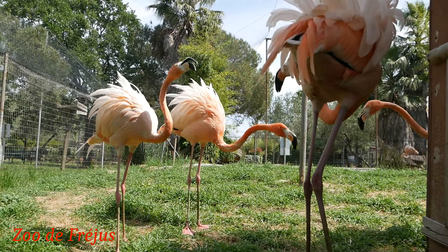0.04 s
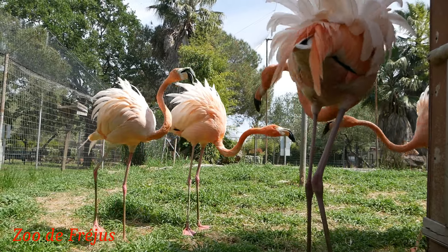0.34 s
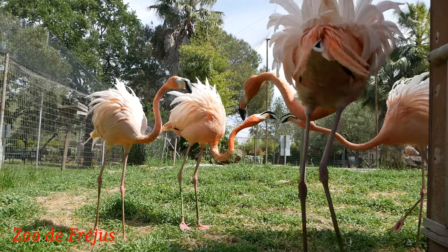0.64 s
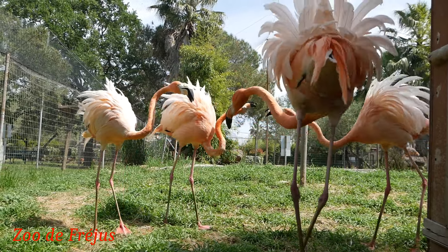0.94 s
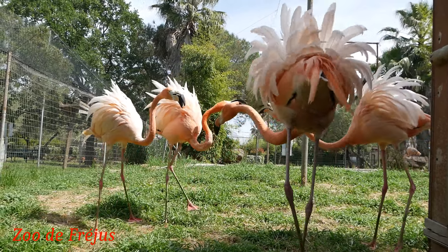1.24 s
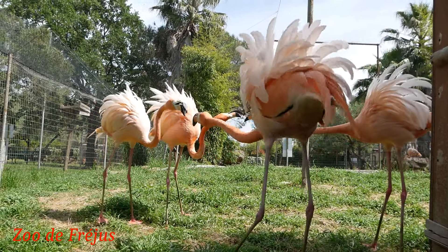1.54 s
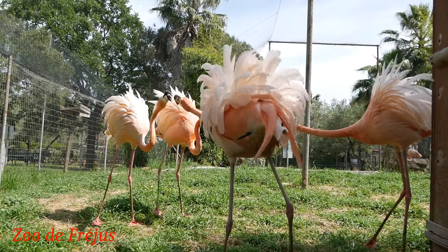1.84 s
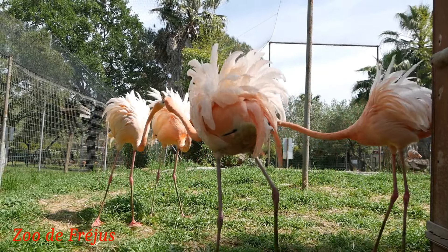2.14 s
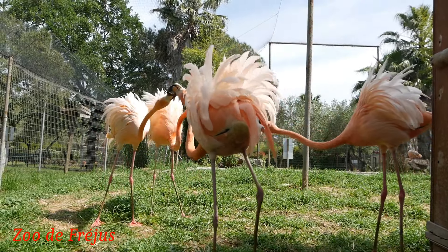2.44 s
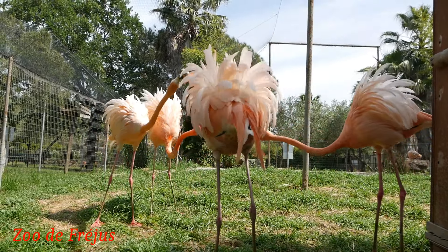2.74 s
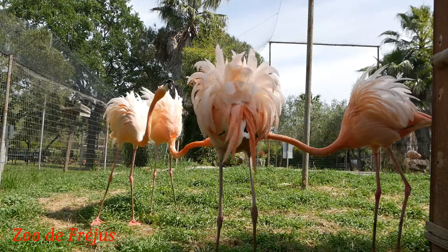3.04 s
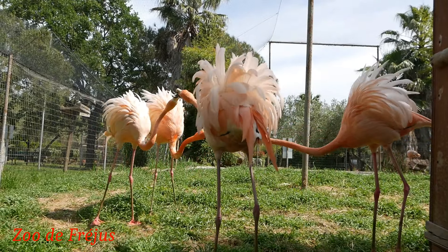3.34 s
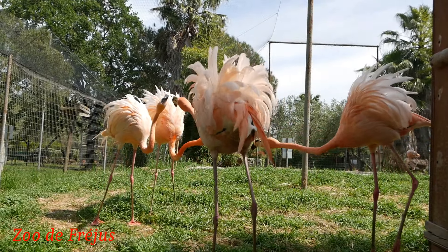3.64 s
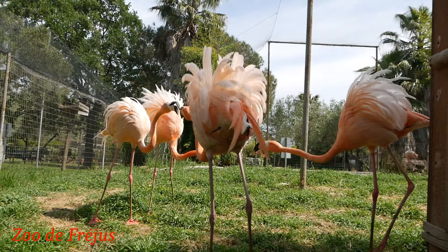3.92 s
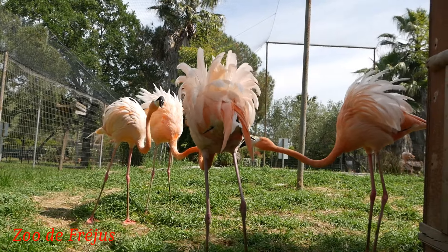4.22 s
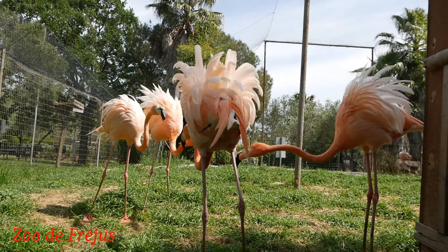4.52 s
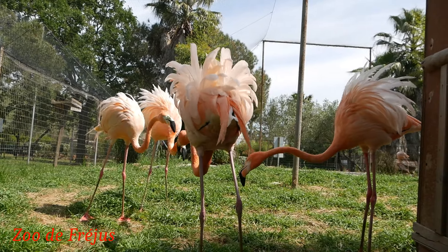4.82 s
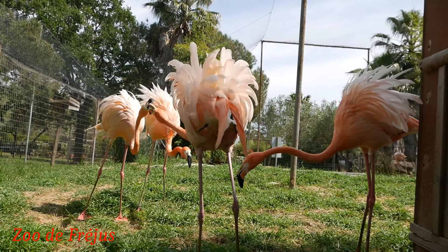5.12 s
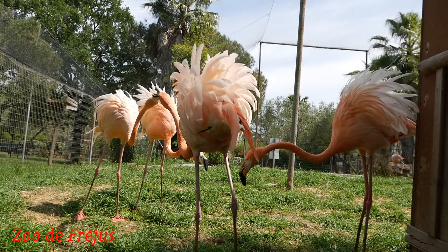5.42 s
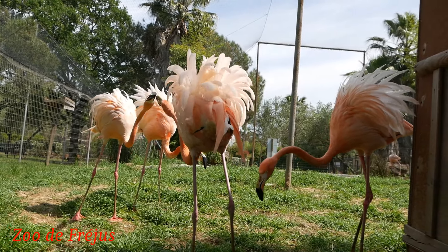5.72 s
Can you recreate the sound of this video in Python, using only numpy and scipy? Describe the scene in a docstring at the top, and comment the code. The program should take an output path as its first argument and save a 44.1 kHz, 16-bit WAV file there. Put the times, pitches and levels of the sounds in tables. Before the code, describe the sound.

Short nasal flamingo honks and higher cackling hoots crowd together, then trade back and forth over faint open air.

```python
"""On a lawn in a pen among trees, four flamingos squabble a few metres away: overlapping bursts first,
then separate calls. Low nasal honks are answered by higher ringing hoots and cackles. Each call is a
source and a filter: pulses from the syrinx and puffs of air excite resonances of throat and nose, and
rough calls throb about 133 times a second. Soft moans and footfalls lie between the calls,
and the trees return a faint tail over a quiet wash of open air."""
import sys
import numpy as np
from scipy import signal
from scipy.fft import rfft, irfft
from scipy.io import wavfile

SR = 44100
rng = np.random.default_rng(int(sys.argv[2]) if len(sys.argv) > 2 else 0)


def int16_out(signal):
    """Quantize to a 16-bit WAV file."""
    q = np.round(np.clip(np.atleast_2d(signal).T, -1, 1) * 32767)
    wavfile.write(sys.argv[1], SR, q.astype(np.int16))


N = 254456

# Low calls: t/s, duration/s, level/dB, f/Hz
HONK_CALLS = [(-.02, 0.17, -21, 232.1), (.14, .11, -17.5, 231.9), (0.491, .11, -21.5, 225.8),
              (0.585, .12, -20.5, 225.7), (.727, .14, -22.5, 231.5), (1.005, .12, -21.5, 223.6),
              (1.092, 0.2, -23, 232.7), (1.339, .088, -27.5, 230.7), (1.41, 0.066, -22, 212.4),
              (1.507, 0.091, -20.5, 216.4), (1.557, 0.102, -23.5, 220.4), (1.634, 0.095, -17.5, 217.6),
              (1.764, .11, -21, 226.8), (1.922, 0.067, -23, 213), (2.012, 0.19, -22, 241.5),
              (2.308, 0.081, -25, 217.6), (2.647, 0.08, -23, 225.7), (3.003, 0.084, -20, 218.6),
              (3.189, .11, -21.5, 235.7), (3.431, 0.072, -22, 216), (3.731, 0.074, -30.5, 217),
              (3.828, 0.066, -19.5, 215.1), (4.116, 0.051, -24, 229.8), (4.174, 0.07, -19, 224.3),
              (4.442, .064, -17, 221.6), (4.672, 0.072, -18.5, 226), (4.953, .079, -19.5, 223),
              (5.212, .14, -19.5, 240.2), (5.591, 0.086, -18, 224)]
# Responses of the throat and of the nasal passage in a honk: f/Hz, relative gain/dB
HONK_THROAT_GAIN = [(50, -51), (250, -36.5), (370, -15.5), (560, -18), (690, -4.5), (920, 8), (1060, -5),
                    (1250, 5.5), (1500, -6), (1750, -10.5), (2100, -33.5), (3000, -46.5)]
HONK_NOSE_GAIN = [(1500, -27), (2100, 6.5), (2650, 20.5), (3000, 18), (3500, 14), (4000, 11), (4600, -64),
                  (7000, -51)]


def honks():
    """Formant tuning: the longer a honk is held, the wider the bill opens and the brighter it rings."""
    out = np.zeros((2, N))
    for start, length, db, hz in HONK_CALLS:
        doublings = np.log2(length / .09)
        excess_hz = hz - 231.2  # a high honk climbs and rasps, a slacker one sinks
        add(out, *call(
            start, length, db, hz, HONK_THROAT_GAIN, HONK_NOSE_GAIN,
            glide=.00268 * excess_hz, arch=.026, jitter=.0711,
            rough=hoarseness(start + length / 2), settle=.51,
            mouth=.9924 + .03 * doublings, sweep=2.28, scatter=.36,
            nose_db=-9 + 4.5 * doublings, rasp_db=-24 + 2.5 * doublings + .33 * excess_hz,
            rise_s=.023, fall_s=.042, dome=.37, lead_s=.007, throat_pan_db=-.5, nose_pan_db=-2.5))
    return out


# High calls: t/s, duration/s, level/dB, f/Hz, nasal level/dB relative to the throat
HOOT_CALLS = [(-.02, 0.13, -21.5, 375, -11.5), (.077, 0.053, -28, 393.4, -1), (0.384, 0.068, -23, 389.5, 0),
              (0.454, 0.12, -21, 394, -12), (0.592, 0.059, -21, 374, -7.5), (0.662, .11, -21, 401.8, -11.5),
              (0.816, 0.059, -21, 387.7, -9), (1.01, .037, -24, 397, 2), (1.072, 0.065, -23.5, 387, -0.5),
              (1.219, 0.071, -22.5, 416.7, -3), (1.361, 0.072, -27, 426.6, -17.5),
              (1.445, 0.08, -22.5, 408.7, -3.5), (1.776, 0.064, -21.5, 414, -4.5),
              (1.912, 0.034, -21.5, 418.3, -15), (2.177, 0.055, -21.5, 400.3, -13),
              (2.249, 0.081, -17.5, 395.6, -10.5), (2.653, 0.11, -21, 401, -13),
              (3.068, .05, -16.5, 393, -14.5), (3.404, 0.049, -18, 403.7, -13.5),
              (3.724, 0.051, -22.5, 431, -16.5), (4.105, 0.062, -21.5, 447.2, -16.5),
              (4.474, 0.036, -20.5, 410.4, -11.5), (4.779, .041, -23.5, 402.4, -.5),
              (5.024, 0.05, -22, 408, -2.5), (5.344, 0.043, -25, 415, -0.5),
              (5.682, 0.039, -24.5, 405.4, 2)]
# Responses of the throat and of the nasal passage in a hoot: f/Hz, relative gain/dB
HOOT_THROAT_GAIN = [(50, -49.5), (420, -27.5), (800, -20.5), (1080, 3), (1230, -2), (1400, -6.5),
                    (1650, -16.5), (2000, -41), (3000, -77)]
HOOT_NOSE_GAIN = [(1600, -26.5), (2200, -14), (2600, -1), (2850, 7.5), (3150, -7.5), (3600, -9),
                  (4500, -52), (7000, -81)]


def hoots():
    """Formant tracking: the throat follows the pitch; nasal pressure roughens a hoot into a cackle."""
    out = np.zeros((2, N))
    plain_s, resting_hz = .0645, 402.9
    for start, length, db, hz, nose_db in HOOT_CALLS:
        pressed_db = nose_db + 8.5
        # a long hoot climbs and rasps, a clipped or high one sinks
        glide = -.018 + 1.29 * (length - plain_s) - .0012 * (hz - resting_hz)
        add(out, *call(
            start, length, db, hz, HOOT_THROAT_GAIN, HOOT_NOSE_GAIN,
            glide=glide, arch=.02, jitter=.045,
            rough=hoarseness(start + length / 2) + .034 + .015 * pressed_db, settle=.1,
            mouth=hz / resting_hz, sweep=1.95, scatter=.16,
            nose_db=nose_db, rasp_db=-24.5 + .69 * pressed_db + 8.5 * np.log2(length / plain_s),
            rise_s=.017, fall_s=.014, dome=.38, lead_s=.005, throat_pan_db=-1.5, nose_pan_db=-4.5))
    return out


# Spectrum of air rasping in the bill: f/Hz, relative level/dB
BILL_RASP = [(2500, -38.5), (4300, 3), (5800, -5.5), (7000, -15), (7800, -13.5), (9100, -6), (11000, -16),
             (14000, -37.5)]


def call(start, length, db, hz, throat, nose, *, glide, arch, jitter, rough, settle, mouth, sweep,
         scatter, nose_db, rasp_db, rise_s, fall_s, dome, lead_s, throat_pan_db, nose_pan_db):
    """Source and filter: pulses and puffs ring throat and nose; the puffs also rasp in the bill."""
    t = np.arange(0, length + 2 * lead_s, 1 / SR)  # the voice stirs just before and after the main push
    n, progress, rough = len(t), t / t[-1], np.clip(rough, 0, 1)
    # the pitch arches and glides, and the resonances move with it
    bend = glide * (progress - .5) + arch * (1 / 4 - (2 * progress - 1) ** 2) + .013 * wander(n, 25)
    opening = 1 + sweep * bend
    pulses, cycles = syrinx(hz * (1 + bend + jitter * (.09 + rough ** 2) * wander(n, 150)))
    puffs = unit_rms((.4 + np.exp(-(cycles % 1) / .3)) * rng.standard_normal(n))
    # amplitude modulation: a slower, uneven flap chops a rough voice into a creak, most at the start
    flap_hz = 133.43 * (1 + .05555 * wander(n, 87.4))
    creak, flap_cycles = syrinx(flap_hz, spread=0)
    depth = np.clip(1.5 * rough * (1 - settle * progress), 0, .92)
    throb = 1 - depth + depth * 2 * np.cos(np.pi * flap_cycles) ** 2
    drive = throb * pulses * np.sqrt(1 - depth ** 2) + .83 * depth ** 2 * creak
    breath = throb * puffs
    throaty = resonate(drive + rough * breath, throat, mouth * opening)
    throaty = unit_rms(np.tanh(throaty / 2))  # saturation blunts the largest swings
    throaty += amp(-19) * depth ** 3 * np.sin(2 * np.pi * flap_cycles)
    nasal = resonate(reflections(drive + (.66 + rough) * breath, scatter), nose, opening)
    rasp = resonate(reflections(breath, .6), BILL_RASP)
    effort = pressure(t, rise_s, fall_s, dome) * amp(.9 * wander(n, 45))
    # the upper bands need more pressure than the throat
    voice = (pan(throaty, throat_pan_db)
             + effort ** .21 * amp(nose_db) * pan(nasal, nose_pan_db)
             + effort ** .72 * amp(rasp_db) * rasp)
    return start - lead_s, amp(db) * effort * voice


# Hoarseness of both voices: t/s, roughness (0 to 1)
ROUGHNESS = [(0, .38), (.7, 0.42), (1.3, 0.31), (1.45, 0.28), (1.68, 0.21), (1.8, 0.45), (2.15, 0.27),
             (2.65, 0.51), (3.2, 0.41), (4.1, 0.59), (5.7, 0.59)]


def hoarseness(time_s):
    """Irregular vibration: the voices clear in the thick of the squabble and grow hoarse afterwards."""
    return np.interp(time_s, *np.transpose(ROUGHNESS))


def syrinx(hz, spread=.3):
    """Harmonic series: pulses smeared by a quadratic phase, returned with their phase in cycles."""
    cycles = np.cumsum(hz) / SR
    harmonics = np.arange(1, SR // 8 // int(hz.mean()))[:, None]
    return unit_rms(np.cos(2 * np.pi * harmonics * cycles + spread * harmonics ** 2).sum(0)), cycles


def pressure(t, rise_s, fall_s, dome):
    """Amplitude envelope: the air pressure of a call rises, rounds off and is released."""
    attack = np.clip(t / rise_s, 0, 1)
    release = np.sin(np.pi / 2 * np.clip((t[-1] - t) / fall_s, 0, 1))
    return attack * release * (abs(np.sin(np.pi * t / t[-1])) + 1e-9) ** dome


def reflections(x, strength, span_s=.004, count=9):
    """Comb filtering: short reflections in bill and neck give each call its own narrow peaks."""
    delays = (rng.random(count) * span_s * SR).astype(int)
    echoes = sum(strength * rng.choice([-1, 1]) * np.pad(x, (d, 0))[:len(x)] for d in delays)
    return unit_rms(x + echoes)


# Soft calls: t/s, duration/s, level/dB, f/Hz, glide/fraction of f, mouth opening (formant ratio)
MOAN_CALLS = [(0.875, 0.085, -53, 249, 0.12, 0.99), (2.378, 0.18, -56, 264.5, -0.029, 0.96),
              (2.589, 0.1, -44, 278.4, -0.093, 1.46), (2.738, 0.098, -54, 279, -0.092, 1.5),
              (3.255, 0.1, -38, 302.3, -0.09, 2.45)]
# Response of the tract with the bill shut: f/Hz, relative gain/dB
SHUT_BILL_GAIN = [(100, -26), (270, -8.5), (540, 2.5), (800, -30), (1300, -20.5), (3000, -61)]


def moans():
    """Low-pass filtering: the shut bill muffles the pulses into smooth, dull notes."""
    out = np.zeros((2, N))
    for start, length, db, hz, glide, mouth in MOAN_CALLS:
        t = np.arange(0, length, 1 / SR)
        pulses, _ = syrinx(hz * (1 + glide * (t / length - .5) + .015 * wander(len(t), 30)))
        effort = pressure(t, rise_s=.0049, fall_s=.034, dome=.12)
        add(out, start, amp(db) * effort * resonate(pulses, SHUT_BILL_GAIN, mouth))
    return out


# Feet on turf: t/s, level/dB, centre f/Hz, decay/s
FOOTFALLS = [(1.58, -39.5, 150, .014), (3.54, -42, 157, 0.0095), (4.834, -42.5, 450, 0.0069),
             (4.902, -44.5, 432, 0.044), (5.236, -38, 140, 0.023)]


def footfalls():
    """Damped impact: webbed feet pat the turf, each a short, dull burst of noise."""
    out, t = np.zeros((2, N)), np.arange(SR // 5) / SR
    turf = [(40, -26), (150, -11.5), (260, -19), (900, -48), (5000, -62)]  # f/Hz, relative gain/dB
    for start, db, hz, decay in FOOTFALLS:
        pat = resonate(rng.standard_normal(len(t)), turf, hz / 150)
        envelope = 2 * t / decay * np.exp(1 - 2 * t / decay)
        add(out, start, amp(db) * envelope * pat)
    return out


# Reverberation time of the trees: f/Hz, T60/s
TREE_T60 = [(1000, 0.33), (3000, 0.7), (10000, 0.59)]


def pen_echoes(x, near_db, near_decay_s, tail_db):
    """Reverberation: early scatter off the ground and a fence post, then a thin tail from the trees."""
    t = np.arange(SR) / SR
    taps = rng.choice([-1., 1.], (2, SR)) * (rng.random((2, SR)) < 3000 / SR)  # 3000 echoes a second
    near = taps * np.exp(-t / near_decay_s)
    hz, delay, bands = signal.stft(taps, SR, nperseg=256)
    decay = amp(-60 * delay / at_frequency(TREE_T60, hz)[:, None])
    tail = signal.istft(bands * decay, SR, nperseg=256)[1][:, :SR]
    echo = amp(near_db) * near / np.linalg.norm(near[0]) + amp(tail_db) * tail / np.linalg.norm(tail[0])
    return signal.fftconvolve(x.mean(0)[None], echo, axes=1)[:, :N]


# Spectrum of the outdoor wash: f/Hz, relative level/dB
AIR_SPECTRUM = [(25, -31.5), (110, -4.5), (200, -5.5), (450, -11.5), (1300, -15), (2000, -32),
                (3300, -23.5), (6300, -41), (14000, -57)]


def air(db=-53.5):
    """Partial coherence: both ears share part of the outdoor hiss but none of its rumble."""
    shared = 1.02 * high_pass(rng.standard_normal(N), hz=350)
    return amp(db) * np.array([resonate(shared + rng.standard_normal(N), AIR_SPECTRUM) for _ in range(2)])


def resonate(x, spectrum, shift=1, size=2048):
    """Minimum-phase filtering to rms 1; shift, a ratio or a curve of ratios, moves the resonances."""
    log_gain = np.log(amp(at_frequency(spectrum, abs(np.fft.fftfreq(size, 1 / SR)))))
    impulse_response = np.fft.ifft(np.exp(np.conj(signal.hilbert(log_gain)))).real
    clock = np.cumsum(shift * np.ones(len(x)))  # a faster clock raises every resonance
    ticks = np.arange(1, clock[-1] + 1)
    rung = signal.fftconvolve(np.interp(ticks, clock, x), impulse_response[:size // 2])[:len(ticks)]
    return unit_rms(np.interp(clock, ticks, rung))


def wander(n, hz):
    """Random fluctuation: noise smoothed above hz, rms about 1."""
    f = np.fft.rfftfreq(SR // 2, 1 / SR)
    return unit_rms(irfft(rfft(rng.standard_normal(SR // 2)) * np.exp(-(f / hz) ** 2)))[:n]


def high_pass(x, hz):
    """Second-order attenuation below hz."""
    return signal.sosfilt(signal.butter(2, hz, "high", fs=SR, output="sos"), x)


def at_frequency(points, hz):
    """Linear interpolation on a log-frequency axis."""
    f, value = np.transpose(points)
    return np.interp(np.log(hz + 1), np.log(f + 1), value)


def pan(x, balance_db):
    """Interaural level difference, left minus right."""
    return x * amp([[balance_db / 2], [-balance_db / 2]])


def amp(db):
    """Amplitude ratio of a level."""
    return 10 ** (np.asarray(db) / 20)


def unit_rms(x):
    """Normalisation to rms 1."""
    return x / np.sqrt(np.mean(x ** 2) + 1e-20)


def add(mix, start_s, sound):
    """Superposition of a sound on the mix from start_s."""
    at = round(start_s * SR)
    sound = sound[..., max(-at, 0):]
    part = mix[:, max(at, 0):][:, :sound.shape[-1]]
    part += sound[..., :part.shape[1]]


def scene():
    """Superposition of the birds' direct sound, the echoes of the pen and the open air."""
    birds = high_pass(honks() + hoots(), hz=59.6) + moans() + footfalls()
    return birds + pen_echoes(birds, near_db=-10, near_decay_s=.016, tail_db=-19.5) + air()


def record(dry, edge_hz=14300):
    """Phase difference between the two microphone ports, then a band limit."""
    ports = (signal.hilbert(dry) * np.exp(.12j * np.array([[1], [-1]]))).real
    low_pass = signal.firwin(255, edge_hz, window=("kaiser", 9), fs=SR)
    return signal.oaconvolve(ports, low_pass[None], "same")


dry = scene()
out = record(dry)
int16_out(out)
```